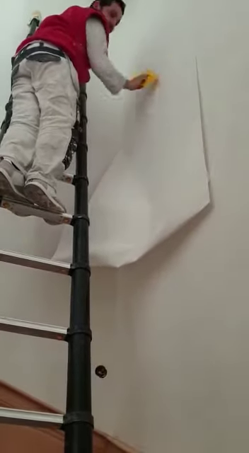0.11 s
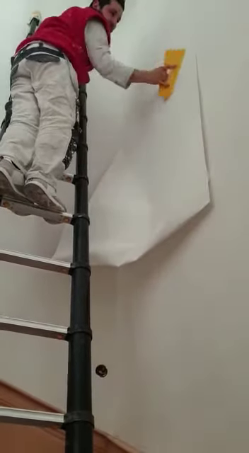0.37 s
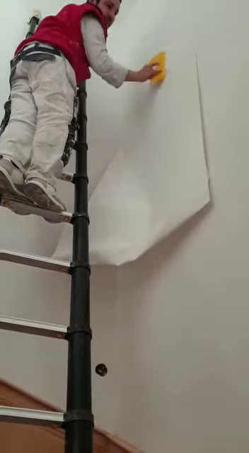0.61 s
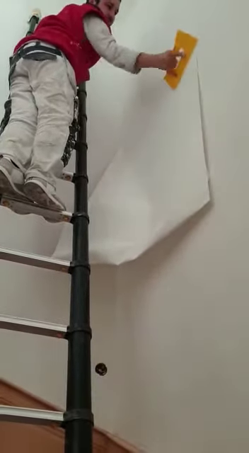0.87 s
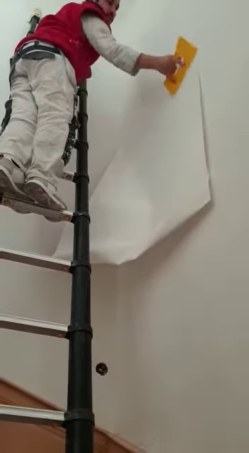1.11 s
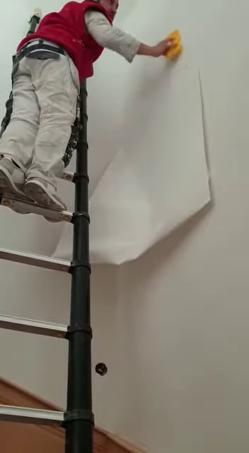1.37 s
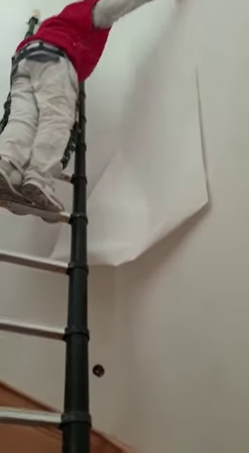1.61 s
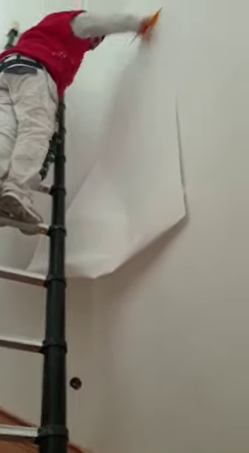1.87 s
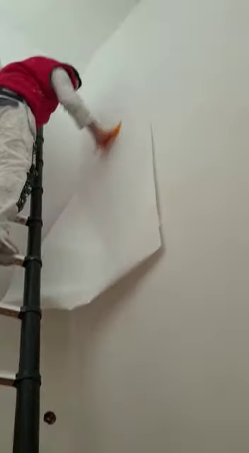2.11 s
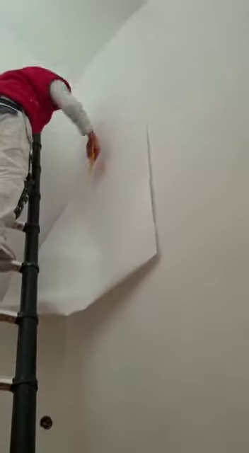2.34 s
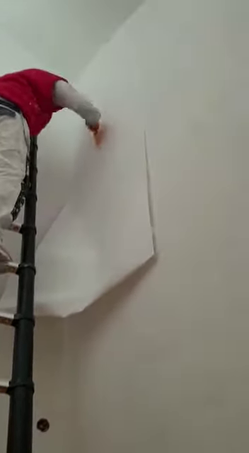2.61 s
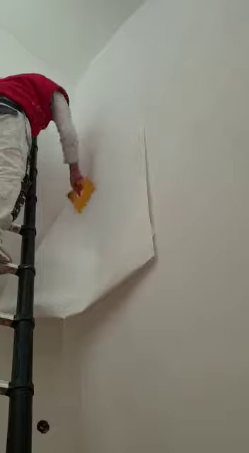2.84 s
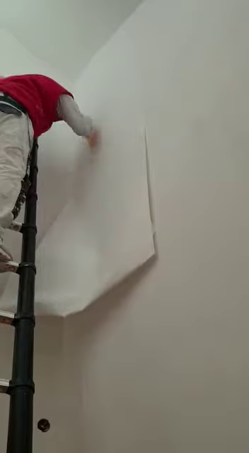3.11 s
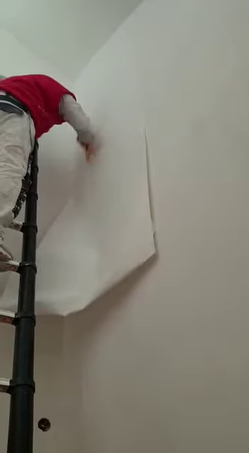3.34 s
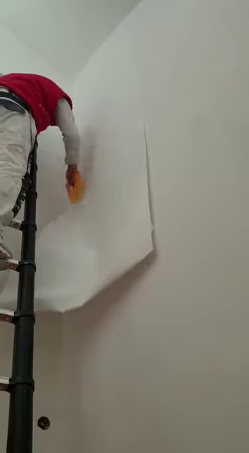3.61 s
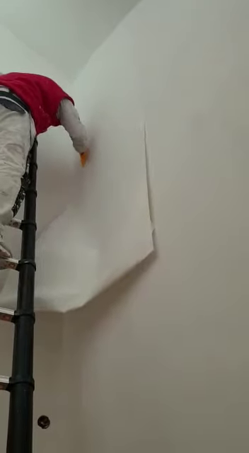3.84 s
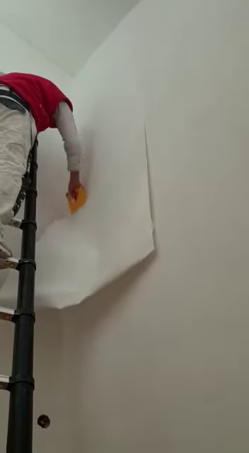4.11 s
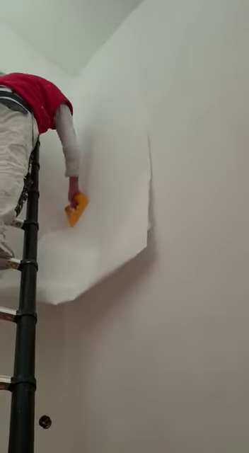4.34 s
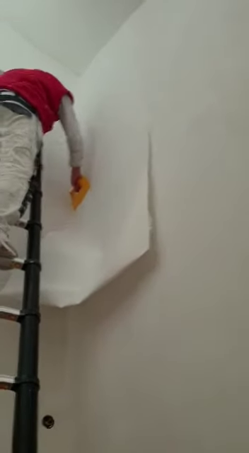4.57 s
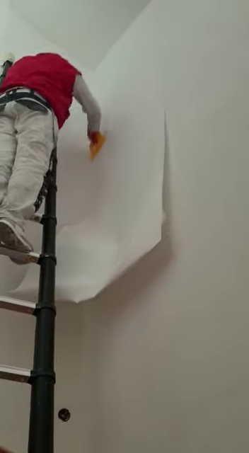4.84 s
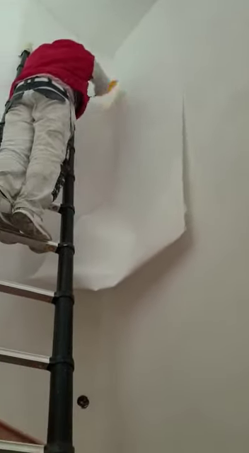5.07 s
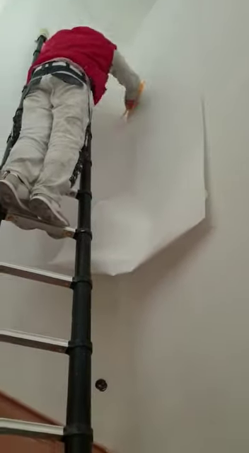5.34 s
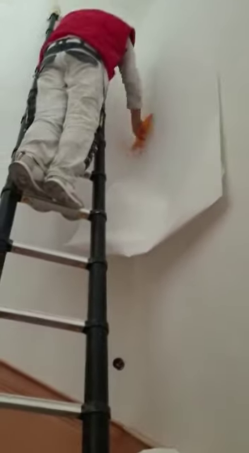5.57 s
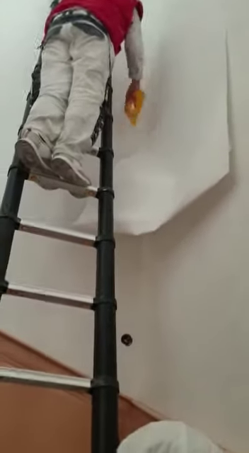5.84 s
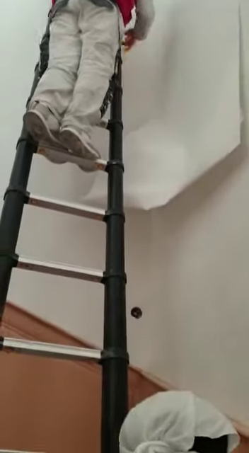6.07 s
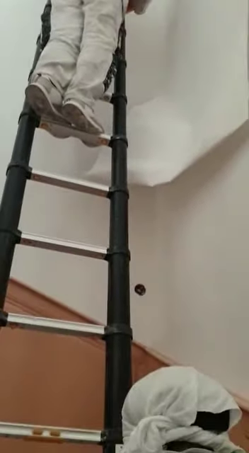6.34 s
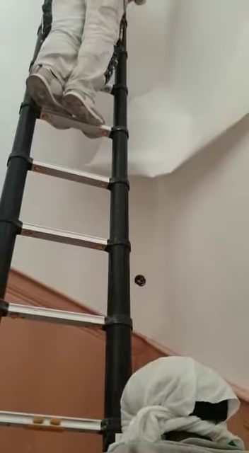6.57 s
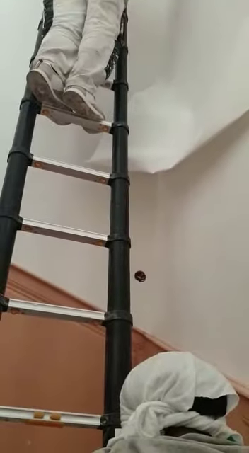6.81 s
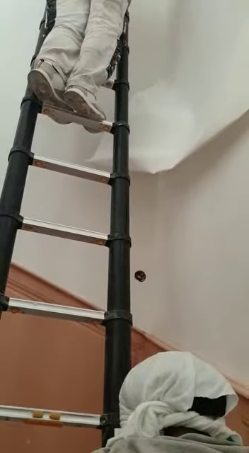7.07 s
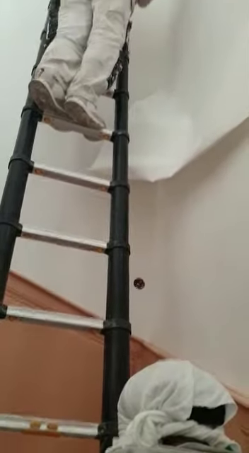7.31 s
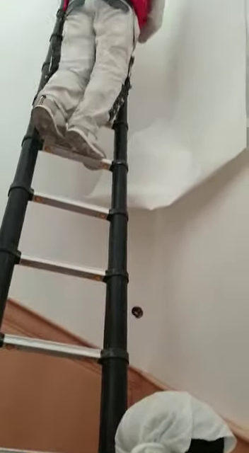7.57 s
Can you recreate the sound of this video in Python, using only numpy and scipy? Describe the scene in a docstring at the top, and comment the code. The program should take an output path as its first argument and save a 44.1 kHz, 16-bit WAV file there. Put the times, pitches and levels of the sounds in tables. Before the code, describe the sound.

A hand-held phone hears a worker smoothing wallpaper from a ladder indoors. Hollow plastic taps and dry rubbing strokes open, with low thuds of the ladder and boards around one second. The rubbing swells into a bright rasp, then a loud clack with a crackle of paper. Softer, spaced strokes continue, another busy group comes after five seconds, and then mostly faint room tone with dull bumps and a last small knock. The bare walls ring briefly.

```python
"""A bare stairwell, where a plastic smoother is swept over pasted wallpaper, heard by a hand-held phone.
Each stroke is friction noise: it shakes the blade's modes, and rasps and hisses at the edge.
The loose sheet drums as noise through a gliding resonance; decaying tones knock as the blade lands, and creases snap.
Ladder and floor boards thud as low decaying tones and boom as filtered noise, over a steady faint room tone.
The walls answer with fixed echoes and a lingering wash of noise."""
import sys
import numpy as np
from scipy import signal
from scipy.fft import rfft, irfft, next_fast_len
from scipy.io import wavfile
from scipy.ndimage import uniform_filter1d, map_coordinates

SR = 44100
rng = np.random.default_rng(int(sys.argv[2]) if len(sys.argv) > 2 else 0)


def elevation(decibels):
    """Turn decibel levels (scalar or array-like) into linear amplitude ratios."""
    levels = np.asarray(decibels, float)
    return 10 ** (levels / 20)


def put_to_file(sound):
    """Save the sound as 16-bit audio at rate SR, in the file named by the first command-line argument."""
    columns = np.atleast_2d(sound).T  # one column per channel
    safe = np.clip(columns, -1, 1)
    whole_steps = np.round(safe * 32767)
    wavfile.write(sys.argv[1], SR, whole_steps.astype(np.int16))


N = 339128  # length in samples
MS = np.arange(0, N / SR, 1 / 1000)  # control times, one a millisecond, in seconds

# Room tone and microphone hiss. Each row: frequency in Hz, relative level in dB per Hz.
QUIET_COLOUR = [(24, -33), (40, -11.5), (101, -7.5), (237, -10.5), (290, -12), (600, -23), (663, -29.5),
                (990, -25.5), (1850, -29), (2380, -26), (8340, -45.5), (13400, -31), (16000, -39.5)]
# Shifts of weight on the boards. Each row: start in seconds, length in seconds, boom level in dB,
# boom pitch in Hz, level of the deep hum in dB over the boom.
WEIGHT_SHIFTS = [(-.03, .08, -66, 170, -3), (0.181, .04, -64.5, 193.4, -3), (.225, 0.072, -45.5, 190, -3),
                 (.42, .06, -56.5, 231, -2), (.585, 0.11, -47, 185, -2), (.85, .12, -43, 147, -4),
                 (1.0, .12, -35.5, 165, -18.5), (1.15, 0.2, -46, 160, 0.5), (1.45, .15, -61, 190, 4),
                 (1.65, .25, -66, 236.5, -3.5), (1.99, .06, -51, 160, 0), (2.15, .05, -54.5, 145, -5),
                 (2.28, 0.081, -59.5, 210, 0), (2.44, .04, -66.5, 140, -0.5), (2.57, 0.11, -57.5, 190, -14),
                 (2.75, 0.21, -68, 244, -30), (3.3, 0.085, -68, 230, -18), (3.58, 0.12, -53, 210, -6.5),
                 (3.82, .05, -63.5, 160.2, -8), (4.0, 0.08, -61, 240, -30), (4.14, .17, -51.5, 240, -17),
                 (4.35, .1, -64, 200, -0.5), (4.52, .1, -50.5, 170, -20), (4.65, 0.22, -51, 230, -39),
                 (5.1, .1, -68.5, 160, 1), (5.3, 0.081, -41.5, 165, -6), (5.42, 0.086, -54.5, 180, -16.5),
                 (5.6, 0.16, -44.5, 207.7, -25), (5.93, 0.034, -63.5, 180, 4),
                 (6.24, 0.071, -50.5, 200, -13), (6.38, 0.088, -44, 145, -2.5), (6.5, 0.086, -57.5, 145, 4),
                 (6.659, 0.18, -75, 135.3, 5), (6.9, 0.08, -64.5, 160, 1), (7.071, 0.18, -69.5, 131, 7),
                 (7.27, 0.078, -49.5, 150, 2), (7.42, 0.25, -59.5, 155, -3), (7.64, .1, -42, 190, -0.5)]
# Colour of the boards. Each row: frequency in Hz, relative level in dB per Hz.
BOARD_COLOUR = [(18, -65), (30, -38), (54, 0), (107, -0.5), (162, -3.5), (183, -8), (206, -9), (330, 3.5),
                (430, -29), (730, -120)]
# Thuds of ladder and boards. Each row: start in seconds, level in dB, pitch in Hz.
THUDS = [(0.235, -27.5, 140), (0.604, -29, 189), (0.858, -32, 214), (1.013, -22.5, 149), (1.041, -25, 138),
         (1.075, -22.5, 157), (1.092, -44, 133), (1.855, -44, 266), (2.014, -38, 115), (2.173, -52.5, 110),
         (2.59, -43, 143), (3.606, -34, 197), (4.201, -36.5, 290), (4.525, -42, 159), (5.337, -32.5, 182),
         (5.659, -40.5, 205), (5.712, -42, 205), (6.403, -34.5, 78), (6.426, -30, 62.5),
         (6.439, -38.5, 174), (6.472, -30.5, 171), (7.291, -31, 100.5), (7.324, -30, 168), (7.36, -27, 176)]
# Snaps of the paper. Each row: start in seconds, level in dB, t60 in seconds, strongest frequency in Hz.
PAPER_SNAPS = [(.230, -44, 0.014, 2500), (2.277, -17, 0.044, 3760), (2.58, -43, 0.072, 2620),
               (3.247, -57.5, .15, 3920), (3.81, -51, 0.0091, 10000), (4.26, -35.5, 0.0074, 10080),
               (5.305, -44.5, 0.065, 2500), (5.334, -39, 0.04, 2400), (6.241, -40, 0.16, 4300),
               (6.385, -50.5, .003, 10330), (6.523, -48, 0.2, 4300), (7.392, -62, .2, 4300)]
# Blade landings and bounces. Each row: start in seconds, level in dB, ring pitch in Hz, ring t60 in seconds,
# blade modes in dB over the ring.
BLADE_KNOCKS = [(0.23, -11.5, 360, 0.02, -8), (.333, -17.5, 756, 0.051, -3), (.651, -18, 510, 0.044, -28),
                (.784, -16.5, 598, 0.033, -9), (2.276, -3, 819, 0.048, -22), (2.286, -6.5, 758, 0.078, -35),
                (2.582, -32, 400, 0.087, -6.5), (3.247, -43, 1354, 0.068, -12),
                (3.405, -26.5, 1100, 0.047, 3), (5.305, -38, 624, 0.095, -1),
                (5.334, -19.5, 1340, 0.014, -2), (5.338, -25, 1320, 0.013, -5),
                (5.931, -39.5, 400, 0.0091, -14), (5.978, -27, 400, 0.011, -16),
                (5.999, -31.5, 400, .008, -14), (6.03, -52, 400, 0.0075, -12),
                (6.255, -42.5, 1226, 0.074, -16), (6.25, -43, 650, 0.062, -24),
                (7.647, -36, 400, 0.033, -20), (7.662, -23, 325, 0.057, -30),
                (7.679, -30, 720, 0.037, -17.5)]
# Modes of the blade. Each row: frequency in Hz, width in Hz, level in dB.
BLADE_MODES = [(1220, 365, 13.5), (1902, 450, 12), (2500, 520, 9.5), (3100, 2280, -3.5),
               (4300, 1500, -12.5)]
# Drumming of the loose sheet. Each row: start in seconds, length in seconds, level in dB,
# first pitch in Hz, last pitch in Hz.
SHEET_DRUMMING = [(-.05, .1, -48, 770, 750), (.225, 0.099, -33, 370, 420), (.33, 0.17, -30, 780, 810),
                  (.62, 0.099, -28.5, 520, 600), (.78, 0.039, -25.5, 590, 700),
                  (.88, 0.14, -39.5, 650, 690), (1.0, 0.091, -37.5, 410, 355),
                  (1.16, 0.18, -40.5, 530, 460), (1.33, 0.37, -34.5, 580, 750), (1.62, 0.19, -37, 800, 860),
                  (1.84, .1, -41.5, 350, 330), (1.97, 0.11, -35, 730, 810), (2.12, .14, -40, 850, 800),
                  (2.282, .04, -30, 790, 760), (2.57, .06, -41, 600, 500), (2.654, 0.39, -44, 690, 659),
                  (2.78, 0.11, -42.5, 720, 760), (3.188, 0.14, -55.5, 520, 490),
                  (3.339, 0.27, -37.5, 690, 752), (3.586, 0.063, -35.5, 730, 566),
                  (3.923, 0.12, -49, 560, 634), (3.992, 0.081, -44, 400, 374),
                  (4.098, 0.089, -42, 600, 500), (4.197, 0.08, -40, 330, 336), (4.5, 0.35, -46.5, 640, 500),
                  (4.72, .2, -48.5, 420, 370), (4.98, .15, -42, 500, 700), (5.335, 0.03, -32.5, 660, 590),
                  (5.44, 0.24, -29, 500, 480), (5.63, .11, -35, 570, 680), (6.173, 0.066, -62, 495, 500),
                  (6.25, .08, -55, 656, 651), (6.4, .2, -63.5, 320, 330), (7.27, .12, -63.5, 330, 600),
                  (7.4, .12, -68.5, 306, 310.3), (7.646, .07, -33.5, 400, 750)]
# Modes of the wall panel behind the paper. Each row: frequency in Hz, width in Hz, level in dB.
PANEL_MODES = [(320, 46, -0.5), (400, 40, 4), (510, 6.3, -6.5), (613.6, 30, -3), (700, 31, -8),
               (792, 39, 5.5), (900, 33, -1.5)]
# Strokes of the blade and the light drag between them. Each row: start in seconds, length in seconds,
# rub in dB on landing, rub in dB at lift-off, hiss in dB over the rub at lift-off.
BLADE_STROKES = [(-.05, .11, -40, -57.5, -6.5), (0.116, .12, -77, -79.5, 2), (.228, .09, -35, -52.5, -2),
                 (0.299, .9, -54, -55, 0), (0.317, 0.19, -35, -38, -3.5), (.59, .12, -35.5, -40, -6.5),
                 (0.767, 0.14, -40.5, -34.5, -8.5), (0.904, 0.075, -43.5, -34, 1),
                 (1.02, 0.078, -40, -43, -3), (1.156, .07, -48.5, -44, -0.5), (1.199, .9, -55, -51, 2.5),
                 (1.277, .15, -46, -37.5, -6.5), (1.46, 0.14, -49, -37, -5), (1.558, 0.085, -26, -26, -1),
                 (1.636, .11, -22.5, -32.5, -1.5), (1.86, 0.1, -36.5, -44, -4),
                 (1.97, 0.2, -39, -38.5, -1.5), (2.102, .13, -41.5, -32.5, -2),
                 (2.236, 0.043, -32.5, -25.5, -5.5), (2.4, .19, -70.5, -76, 4),
                 (2.597, .1, -64.5, -59, -1.5), (2.683, .24, -49, -41, -4), (2.98, .27, -73.5, -80.5, 3),
                 (3.24, 0.17, -67, -62, -2), (3.317, 0.075, -62, -44.5, -8.5),
                 (3.39, 0.19, -38, -43.5, -8.5), (3.552, 0.085, -41.5, -41.5, -2),
                 (3.76, 0.19, -63, -76, 2), (3.916, 0.15, -61.5, -50, -7), (4.071, 0.21, -45.5, -48, -3),
                 (4.297, .17, -69.5, -74, 3), (4.455, .2, -59.5, -53, -2), (4.633, 0.28, -54, -50.5, 1.5),
                 (4.89, 0.13, -44.5, -51, 5.5), (5.0, 0.099, -41, -37, -5.5), (5.336, 0.12, -40, -39, -4),
                 (5.389, 0.18, -42, -32.5, -2), (5.54, .17, -37, -29.5, -3.5),
                 (6.25, 0.061, -53, -60, -3.5), (6.376, 0.15, -68, -68.5, -12.5),
                 (7.316, .2, -75, -76, -4.5), (7.623, .1, -63.5, -55, -23)]
# How far the wrist flexes the edge. Each row: time in seconds, rasp in dB over the rub before the hiss adds its share.
EDGE_FLEX = [(0, -9), (.5, -8.5), (.8, -6.5), (1.05, -4.5), (1.4, -6), (1.7, -0.5), (1.9, -0.5), (2.2, 0),
             (2.7, -3.5), (3.3, 0.5), (3.6, -1), (4.1, -1), (4.6, -2.5), (4.9, 2.5), (5.15, -6.5),
             (5.45, 2.5), (5.65, 1.5), (5.75, -6.5), (6.3, -14), (6.45, 3.5), (7.4, 4.5), (7.65, -2.5)]
# Colour of the edge hiss. Each row: frequency in Hz, relative level in dB per Hz.
HISS_COLOUR = [(1760, -36.5), (3000, -5), (3470, -6), (4240, -5.5), (5150, -11), (7080, -15), (9340, -19),
               (12500, -11.5), (15700, -18)]
# Decay of the stairwell. Each row: frequency in Hz, t60 in seconds.
STAIRWELL_DECAY = [(150, .6), (750, 0.64), (2000, 0.45), (5000, .33), (8000, .25), (12000, 0.2)]
# Left-right likeness of diffuse sound. Each row: frequency in Hz, likeness from 0 to 1.
PORT_LIKENESS = [(40, 0.75), (120, 0.82), (250, .88), (500, 0.41), (1000, 0.048), (2000, 0.014)]
# Colour of the two microphone ports. Each row: frequency in Hz, left minus right in dB.
PORT_COLOUR = [(60, 1.5), (99, -2), (160, 1), (270, 0), (450, 1.5), (740, -2), (1220, -2.5), (2010, -7),
               (3330, -7.5), (5500, 2), (9080, 3), (15000, -1.5)]


def unit(x):
    """Scales a signal to rms 1."""
    return x / np.sqrt(np.mean(x ** 2) + 1e-20)


def along(points, hz):
    """Reads (Hz, value) points on a log frequency axis."""
    f, v = np.transpose(points)
    return np.interp(np.log(hz + 1), np.log(f + 1), v)


def wobble(rate):
    """A smooth random curve, rate knots a second."""
    knots = rng.standard_normal(int(N * rate / SR) + 4)
    return map_coordinates(knots, [np.arange(N) * rate / SR])


def filtered(x, response):
    """Filters x by a complex response of frequency."""
    m = next_fast_len(x.shape[-1] + SR // 2)
    spectrum = rfft(x, m) * response(np.fft.rfftfreq(m, 1 / SR))
    return irfft(spectrum, m)[..., :x.shape[-1]]


def moving(x, shape):
    """Filters x by a shape(Hz, s) that changes with time, then scales it to rms 1."""
    f, t, z = signal.stft(x, SR, nperseg=1024)
    shaped = signal.istft(z * shape(f[:, None], t), SR, nperseg=1024)[1]
    return unit(shaped[..., :N])


def mode(f, hz, width_hz):
    """The response of one causal resonance."""
    return 1j * f * width_hz / (hz * hz - f * f + 1j * f * width_hz)


def spans(rows, t, rise_s, fall_db_per_s):
    """For each row (start, length, ..): how far it has come (0-1) and its gain: rise, hold, fall."""
    start, length = np.transpose(rows)[:2, :, None]
    done = np.clip((t - start) / length, 0, 1)
    rise = np.clip((t - start) / rise_s, 0, 1)
    fall = elevation(-fall_db_per_s * np.maximum(t - start - length, 0))
    return done, rise * fall


def per_sample(x):
    """Reads a once-a-millisecond control at every sample."""
    return np.interp(np.arange(N) / SR, MS, x)


def loudest(gain, hz):
    """Average pitch weighted by power, so the strongest event at each moment leads."""
    return np.sum(gain ** 2 * hz, axis=0) / np.sum(gain ** 2, axis=0)


def room_tone():
    """The steady faint background: noise with a fixed colour."""
    noise = rng.standard_normal((2, N))
    return elevation(-70.5) * unit(filtered(noise, lambda f: elevation(along(QUIET_COLOUR, f))))


def rumble():
    """A lumpy boom in the boards; the lowest air mode of the stairwell hums along."""
    sway_db, sway_hz = -78.5, 140  # small unceasing sway of the ladder
    boom_db, hz, deep_db = np.transpose(WEIGHT_SHIFTS)[2:, :, None]
    shifts = spans(WEIGHT_SHIFTS, MS, rise_s=0.072, fall_db_per_s=159)[1] * elevation(boom_db)
    sway = np.full(len(MS), elevation(sway_db))
    boom_hz = loudest(np.vstack([shifts, sway]), np.vstack([hz, sway_hz]))

    def board_shape(f, t):
        resonance = abs(mode(f, np.interp(t, MS, boom_hz), 45)) ** 2
        return elevation(along(BOARD_COLOUR, f)) * (0.16 + resonance)

    boom = moving(rng.standard_normal((2, N)), board_shape)
    deep = unit(filtered(rng.standard_normal((2, N)), lambda f: mode(f, 69.8, 40) ** 4))
    restless = elevation(sway_db + 1.3 * wobble(8.7))
    booming = per_sample(shifts.sum(axis=0)) + restless
    humming = per_sample(np.sum(shifts * elevation(deep_db), axis=0)) + elevation(-4) * restless
    lumps = elevation(3.1 * wobble(25))
    return lumps * (booming * boom + humming * deep)


def thuds():
    """Soft low bumps of ladder feet and boards: a decaying tone with a fainter overtone."""
    rise_s, t60_s = .005, .09
    out, t = np.zeros(N + SR), np.arange(SR // 4) / SR
    for s, db, hz in THUDS:
        bump = np.sin(2 * np.pi * hz * t) + .25 * np.sin(2 * np.pi * 1.9 * hz * t)
        envelope = elevation(db - 60 * t / t60_s) * (1 - np.exp(-t / rise_s))
        out[round(s * SR):][:len(t)] += envelope * bump
    return out[:N]


def snaps():
    """Sudden noise bursts as the sheet creases or lets go: two bands pitched per crease, under a common fizz."""
    out, t = np.zeros(N + SR), np.arange(SR // 3) / SR
    for s, db, t60, hz in PAPER_SNAPS:
        burst = elevation(db - 60 * t / t60) * rng.standard_normal(len(t))

        def crease(f):
            lower = 0.98 * mode(f, .57 * hz, .12 * hz)
            strongest = 1.3 * mode(f, hz, 0.16 * hz)
            fizz = 0.3 * mode(f, 12500, 6000)
            return lower - strongest + fizz

        out[round(s * SR):][:len(t)] += filtered(burst, crease)
    return out[:N]


def knocks():
    """The landing blade: a short hollow ring of two close tones, with the blade's modes on top."""
    out, t = np.zeros(N + SR), np.arange(SR // 4) / SR
    for s, db, hz, t60, blade_db in BLADE_KNOCKS:
        fade = elevation(-60 * t / t60) * (1 - np.exp(-t / 0.0015))
        ring = np.sin(2 * np.pi * hz * t) + 0.37 * np.sin(2 * np.pi * .92 * hz * t)
        scatter_db = rng.normal(0, 2, len(BLADE_MODES))  # each knock excites the modes differently
        for (mode_hz, _, mode_db), scatter in zip(BLADE_MODES, scatter_db):
            mode_gain = elevation(blade_db + mode_db + scatter - 60 * t / 0.011)
            ring += mode_gain * np.sin(2 * np.pi * mode_hz * t)
        out[round(s * SR):][:len(t)] += elevation(db) * fade * ring
    return filtered(out[:N], lambda f: (1j * f / (1j * f + 250)) ** 2)  # low cut


def drumming():
    """Strength and pitch of the sheet: quick billow, slow sag; pitch glides as the free span of paper changes."""
    billow_share, sag_db = 0.17, 8.5  # part of the length spent rising, loss over the length
    length, db, first_hz, last_hz = np.transpose(SHEET_DRUMMING)[1:, :, None]
    done, gain = spans(SHEET_DRUMMING, MS, billow_share * length, fall_db_per_s=249)
    gain = gain * elevation(db - sag_db * done) + 1e-9
    glide_hz = first_hz * (last_hz / first_hz) ** done
    return gain.sum(axis=0), loudest(gain, glide_hz)


def strokes():
    """Strength of rub, rasp and hiss: each stroke lands, moves to its last level and lifts off."""
    bend = 2  # how early the rub nears its last level
    hiss_lag_db = 3  # the hiss starts this far behind and catches up as the blade gains speed
    rasp_per_hiss = 0.4  # dB of rasp gained for each dB of hiss
    hiss_stop_db_per_s = 600  # after lift-off the hiss falls this much faster than the rub
    done, gain = spans(BLADE_STROKES, MS, rise_s=.03, fall_db_per_s=332)
    start, length, land_db, lift_db, hiss_db = np.transpose(BLADE_STROKES)[:, :, None]
    rub_db = lift_db + (land_db - lift_db) * (1 - done) ** bend
    hiss_db = hiss_db - hiss_lag_db * (1 - done)
    rasp_db = np.interp(MS, *np.transpose(EDGE_FLEX)) + rasp_per_hiss * hiss_db
    hiss_db = hiss_db - hiss_stop_db_per_s * np.maximum(MS - start - length, 0)
    # overlapping strokes add in power
    return [np.sqrt(np.sum((gain * elevation(rub_db + over_db)) ** 2, axis=0)) for over_db in (0, rasp_db, hiss_db)]


def grit(per_second, spread_db):
    """Tiny catches of the edge on the grain of the paper, of scattered size, over fine friction."""
    catch = rng.random(N) < per_second / SR
    size = elevation(spread_db * rng.exponential(1, N)) * rng.standard_normal(N)
    return unit(unit(catch * size) + 1.3 * rng.standard_normal(N))


def smoother():
    """The rub shakes the blade, rasps and hisses at its edge and drums on the loose sheet."""
    rub_gain, rasp_gain, hiss_gain = strokes()
    drum_gain, drum_hz = drumming()
    hand = elevation(1.2 * wobble(35))  # the hand presses unevenly
    force = grit(per_second=3000, spread_db=3.5)
    edge = grit(per_second=5900, spread_db=2.5)

    def blade_response(f):
        # neighbouring modes have opposite signs
        return sum((-1) ** k * elevation(db) * mode(f, hz, w) for k, (hz, w, db) in enumerate(BLADE_MODES))

    def sheet_shape(f, t):
        panel = sum(elevation(db) * abs(mode(f, hz, w)) ** 2 for hz, w, db in PANEL_MODES)
        gliding = abs(mode(f, np.interp(t, MS, drum_hz), 150)) ** 2
        broad = 0.54 * abs(mode(f, 700, 1500)) ** 4
        return (gliding + broad) * (0.88 + panel)

    rub = per_sample(rub_gain) * unit(filtered(force, blade_response))
    rasp = per_sample(rasp_gain) * unit(filtered(edge, lambda f: mode(f, 2343, 600) ** 2))
    hiss = per_sample(hiss_gain) * unit(filtered(edge, lambda f: elevation(along(HISS_COLOUR, f))))
    drum = moving(rng.standard_normal(N), sheet_shape) * elevation(2.4 * wobble(22))
    return hand * (rub + rasp + hiss), hand * per_sample(drum_gain) * drum


def echoes(x):
    """One fixed set of echoes per port: each frequency dies at its own speed."""
    f, t, z = signal.stft(rng.standard_normal((2, 3 * SR // 4)), SR, nperseg=128)
    t60 = along(STAIRWELL_DECAY, f)[:, None]
    tail = signal.istft(z * elevation(-60 * t / t60) / np.sqrt(t60), SR, nperseg=128)[1]
    tail = tail / np.linalg.norm(tail[0])
    late = np.pad(x, (250, 0))  # delay in samples
    return signal.fftconvolve(late[None], tail, axes=1)[:, :N]


def wash(x, patchy_db):
    """A travelling source meets ever new echoes: its energy lingers per band as noise, stronger where echoes agree."""
    late = np.pad(x, (500, 0))[:N]  # delay in samples
    f, t, z = signal.stft(late, SR, nperseg=512)
    keep = elevation(-120 * t[1] / along(STAIRWELL_DECAY, f))  # share of energy left after one frame
    energy = abs(z) ** 2
    for k in range(len(t)):
        energy[:, k] = (1 - keep) * energy[:, k] + keep * energy[:, k - 1] * (k > 0)
    noise = signal.stft(rng.standard_normal((2, N)), nperseg=512)[2]
    patches = unit(uniform_filter1d(rng.standard_normal(noise.shape), size=14, axis=2))
    noise = noise * elevation(patchy_db * patches)
    noise = noise / np.sqrt(np.mean(abs(noise) ** 2))
    return signal.istft(noise * np.sqrt(energy), nperseg=512)[1][:, :N]


def diffuse(pair):
    """Two unrelated signals made alike in the bass, as two close microphones hear them."""
    def mid_side(f):
        turn = np.arccos(np.clip(along(PORT_LIKENESS, f), -1, 1)) / 2
        return np.sqrt(2) * np.array([np.cos(turn), np.sin(turn)])

    mid, side = filtered(pair, mid_side)
    return np.array([mid + side, mid - side]) / np.sqrt(2)


def scene():
    """The smoother reaches the left port first, by a lead that shifts as hand and phone move; the walls answer."""
    rub, drum = smoother()
    hits = knocks() + snaps()
    bumps = thuds()
    near = rub + drum + hits
    lead = 11 + 4 * wobble(3)  # samples
    right = map_coordinates(near, [np.arange(N) - lead])
    direct = elevation(-3.0) * np.array([near, right])
    walls = wash(elevation(-1.5) * rub + elevation(-8) * drum, patchy_db=2.5)
    walls += echoes(elevation(0.5) * hits + elevation(-7.0) * rub + elevation(-0.5) * drum + elevation(-9) * bumps)
    return direct + bumps + diffuse(walls + rumble() + room_tone())


def band_limit(x):
    """A steep low-pass at the top of the band."""
    return signal.sosfilt(signal.butter(12, 16450, fs=SR, output="sos"), x)


def record(dry):
    """Each microphone port colours its side; deep bass and everything above the band limit are lost."""
    def port_response(f):
        band = (f < 15800) * (1j * f / (1j * f + 35)) ** 2  # Hz
        return band * elevation(np.outer([.5, -.5], along(PORT_COLOUR, f)))

    return band_limit(filtered(dry, port_response))


dry = scene()
out = record(dry)
put_to_file(out)
```